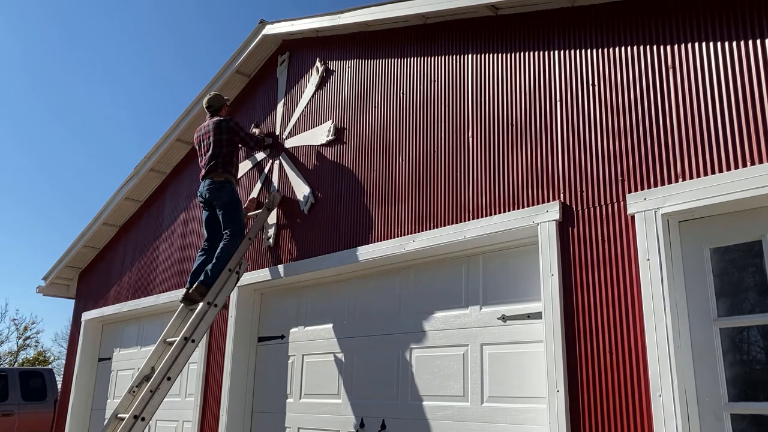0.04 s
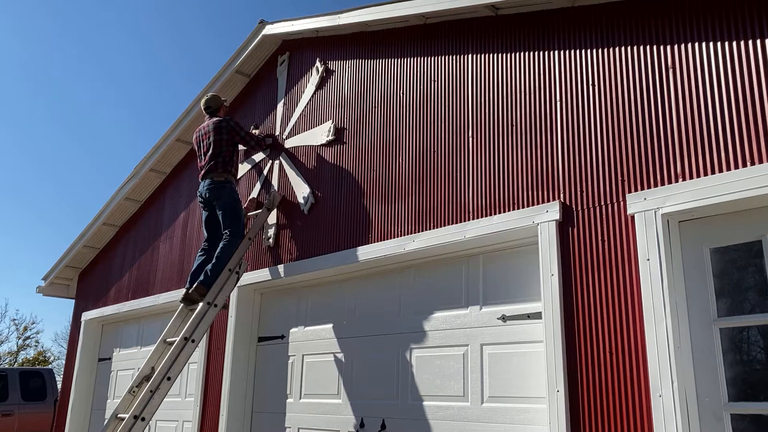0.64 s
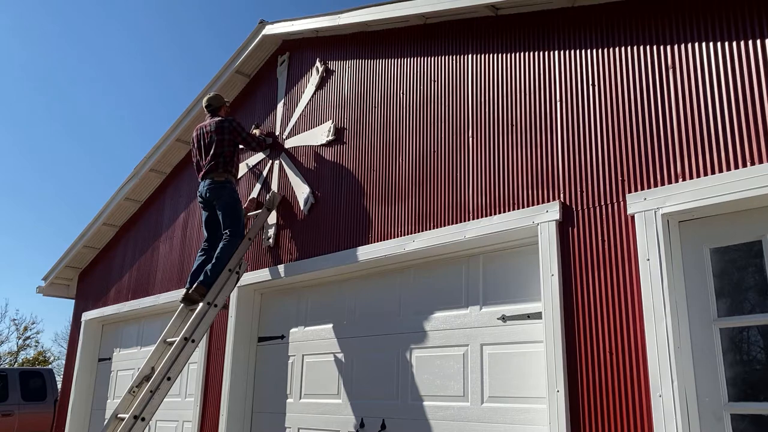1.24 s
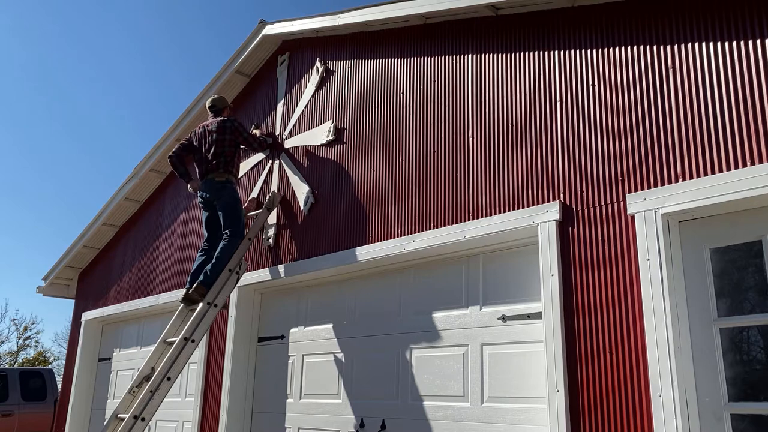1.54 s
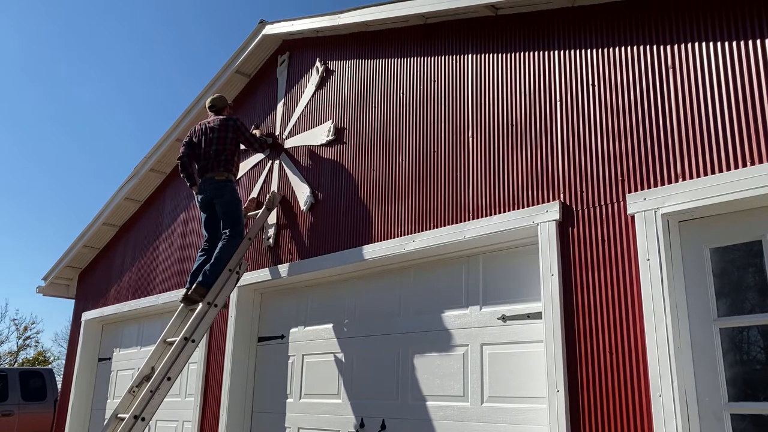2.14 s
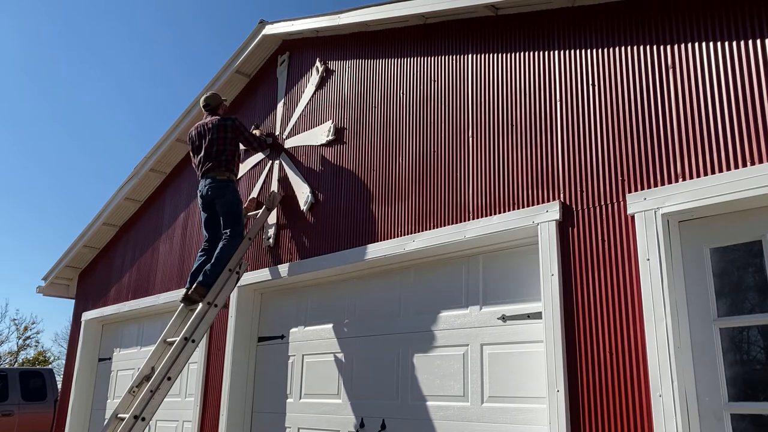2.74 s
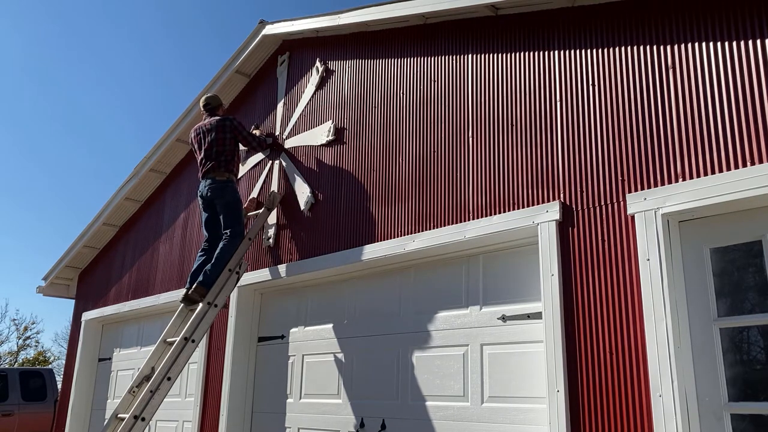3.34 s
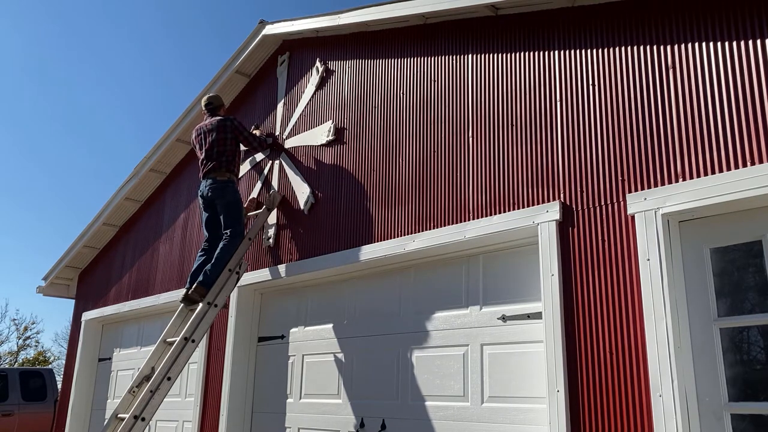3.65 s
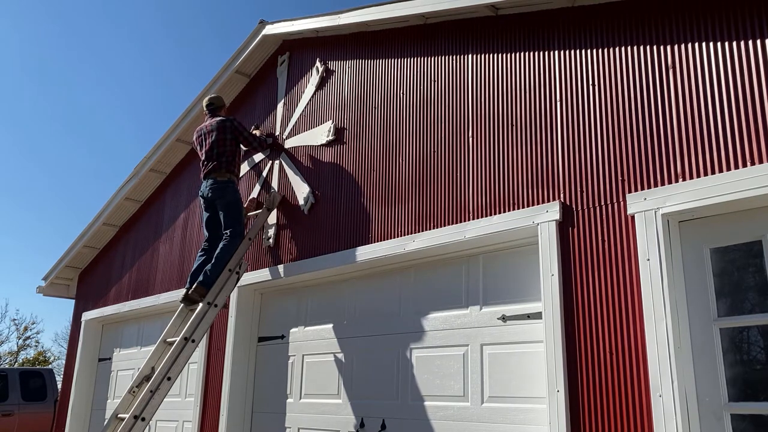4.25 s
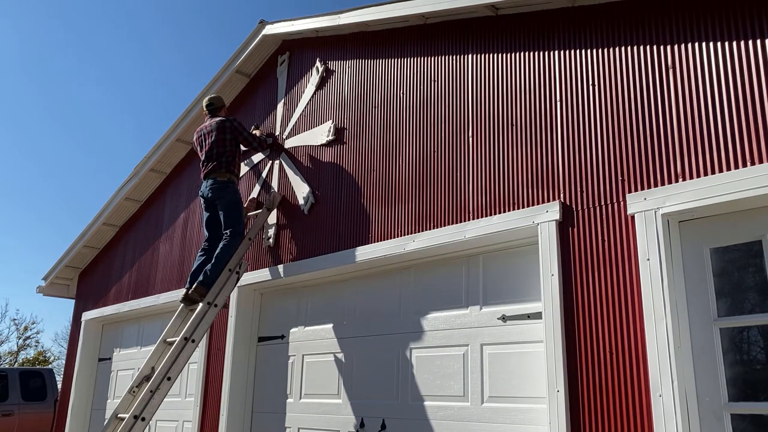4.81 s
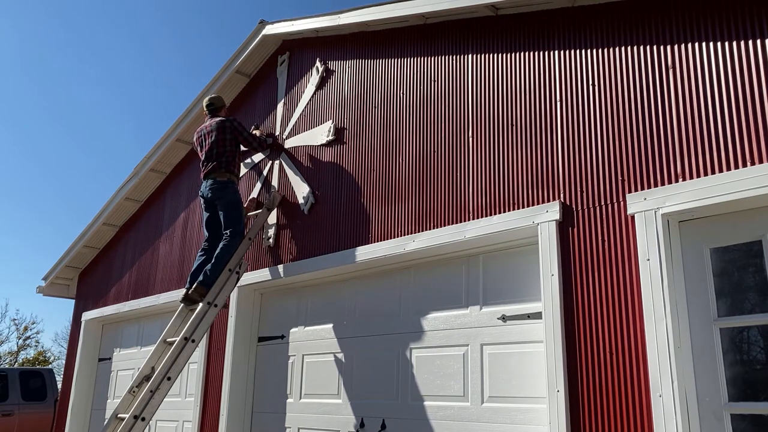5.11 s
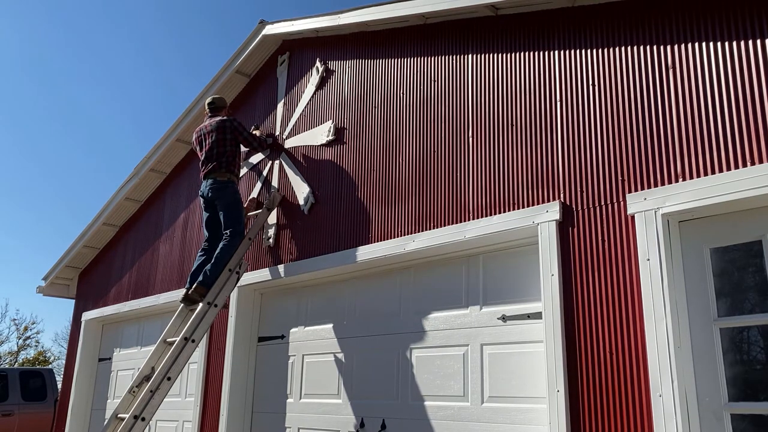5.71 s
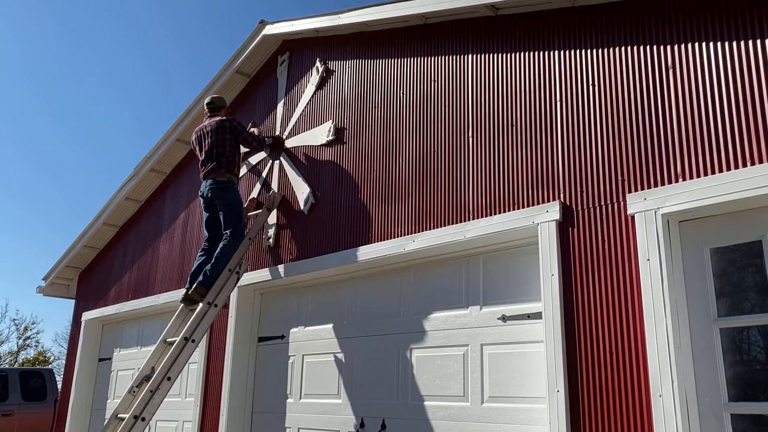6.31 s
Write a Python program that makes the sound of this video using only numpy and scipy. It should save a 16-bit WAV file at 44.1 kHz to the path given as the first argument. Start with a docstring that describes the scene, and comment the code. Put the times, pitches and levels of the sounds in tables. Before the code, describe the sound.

Someone works on a metal ladder against a sheet-metal barn wall. Light, uneven knocks come a few times a second, each with a small bounce and a short ringing clatter. They grow louder midway, ease off, then pick up near the end. Hanging steel saws click and faintly rattle among dull scuffs. Small birds chirp faintly in the yard, and a breeze flutters and thumps on the microphone.

```python
"""Knocks ring a metal ladder and a sheet-metal barn wall as someone works on old saws hung there.
Each knock bounces once, sets the metal ringing and clattering, and echoes briefly in the yard.
The steel saws click when tapped and rattle against the wall, among a few dull scuffs.
Small birds chirp overhead, and a light breeze flutters and thumps on the microphone
over a faint outdoor hush."""
import sys
import numpy as np
from scipy import signal
from scipy.fft import rfft, irfft, next_fast_len
from scipy.io import wavfile
from scipy.ndimage import uniform_filter1d

SR = 44100
rng = np.random.default_rng(int(sys.argv[2]) if len(sys.argv) > 2 else 0)


def dump_mix(stems):
    """Bounce the given channels to the path in sys.argv[1] as a 16-bit WAV at rate SR."""
    frames = np.atleast_2d(stems).T  # one column per channel
    limited = np.clip(frames, -1, 1)  # hard clip at full scale
    pcm = np.round(limited * 32767).astype(np.int16)
    wavfile.write(sys.argv[1], SR, pcm)


N = 289737

# Puffs of wind that hit the microphone:
# (time of the crest [s], level [dB], pitch [Hz], swell time [s], treble drop [dB per octave])
PUFFS = [(0.207, -33, 107, 0.0054, 20), (0.471, -47.5, 67.4, 0.028, 29), (0.599, -42.5, 78, 0.0073, 30),
         (0.951, -49.5, 61.4, 0.0098, 8), (1.229, -41, 87, 0.019, 17), (1.3, -35, 70.5, 0.0063, 21),
         (2.385, -54, 57.7, 0.019, 13.5), (2.778, -40, 70.7, 0.0055, 35), (3.018, -36.5, 69.3, 0.024, 26.5),
         (3.173, -34, 52.6, 0.015, 23), (3.222, -25, 80, 0.008, 18), (3.25, -25, 72.5, 0.01, 20),
         (3.463, -33, 93, 0.0048, 17.5), (3.589, -53.5, 253, 0.016, 16.5), (3.747, -60.5, 248, 0.018, 15),
         (4.257, -34, 60.3, 0.018, 15.5), (4.269, -32, 204.4, 0.0022, 23.5), (4.352, -45.5, 91, 0.027, 15),
         (4.547, -49.5, 68, 0.0077, 12), (5.373, -41, 172, 0.0049, 21), (5.436, -49, 94, 0.0082, 12.5),
         (5.759, -44, 80, 0.0066, 15.5), (5.939, -45, 71.5, 0.013, 14), (6.019, -43.5, 108, 0.015, 15),
         (6.174, -47.5, 60.7, 0.03, 21), (6.268, -53, 205, 0.013, 40), (6.417, -47, 59.4, 0.016, 41)]


def undb(db):
    """Turn decibels into a factor to multiply by."""
    return 10 ** (np.asarray(db) / 20)


def unit(x):
    """Scale a sound to an average (rms) strength of 1."""
    return x / np.sqrt(np.mean(x ** 2))


def colour(x, points):
    """Shape bass and treble along a curve of (frequency [Hz], gain [dB]) points."""
    hz, db = np.transpose(points)
    size = next_fast_len(x.shape[-1] + SR // 10)
    freqs = np.fft.rfftfreq(size, 1 / SR)
    gain = undb(np.interp(np.log(freqs + 1), np.log(hz), db))
    return irfft(rfft(x, size) * gain, size)[..., :x.shape[-1]]


def noise(size, side_db):
    """Stereo noise; the lower side_db is, the more alike left and right are."""
    mid, side = rng.standard_normal((2, size))
    return unit(mid + undb(side_db) * side * np.array([[1], [-1]]))


def walk(size, count):
    """Random levels joined by straight lines."""
    return np.interp(np.arange(size), np.linspace(0, size, count), rng.standard_normal(count))


def fade(t, t60):
    """Die away by 60 dB in t60 seconds, the fade time."""
    return np.exp(-np.log(1000) * t / t60)


def rise(t, rise_s):
    """Grow from 0 towards 1, about two thirds of the way in rise_s seconds."""
    return 1 - np.exp(-t / rise_s)


def pan(db):
    """Left and right gains; a negative db leans to the right."""
    return undb(np.array([[db], [-db]]) / 2)


def add(out, s, x):
    """Mix x into out at s seconds."""
    start = int(s * SR)
    first, last = max(start, 0), min(start + x.shape[-1], N)
    out[:, first:last] += x[..., first - start:last - start]


def yard(x, echo_s, echo_db, tail_db, t60, treble_db):
    """The yard adds one clear echo and a thin, fading tail to a sound."""
    t = np.arange(SR * 2 // 3) / SR
    tail = noise(len(t), side_db=-3.5) * fade(t, t60) * rise(t, 0.0033)
    response = tail * undb(tail_db) / np.sqrt(np.sum(tail ** 2) / 2)
    response[:, int(echo_s * SR)] += undb(echo_db)
    response = colour(response, [(1000, -1.5), (2800, 1.3), (10000, treble_db)])
    return x + signal.fftconvolve(x, response, axes=1)[:, :N]


def whistle(length, start_hz, end_hz, db, bend, octave_db):
    """One wobbly bird note with an overtone; more bend makes it slide early and then level off."""
    wobble_hz = 127
    progress = np.linspace(0, 1, int(length * SR))
    wobble = unit(uniform_filter1d(rng.standard_normal(len(progress)), size=40))
    slide = np.expm1(-bend * progress) / np.expm1(-bend)
    hz = start_hz + (end_hz - start_hz) * slide + wobble_hz * wobble
    phase = 2 * np.pi * np.cumsum(hz) / SR
    swell = np.abs(np.sin(np.pi * progress)) ** 1.35
    return undb(db) * swell * (np.sin(phase) + undb(octave_db) * np.sin(2 * phase))


def birds():
    """Small birds whistle rising and falling notes, which the trees and wall scatter."""
    # Rising chirps:
    # (time [s], length [s], start pitch [Hz], end pitch [Hz], level [dB], overtone against the note [dB])
    chirps = [(-.008, 0.028, 5900, 7615, -50, -13), (1.106, 0.031, 5700, 6770, -76.5, -30),
              (1.898, 0.039, 5800, 7670, -49.5, -8), (2.678, 0.056, 5540, 6580, -74, -38),
              (3.779, 0.03, 5560, 7750, -43.5, -18), (4.777, 0.019, 5200, 6400, -66.5, -30),
              (4.791, 0.033, 6400, 7590, -66.5, -30), (4.953, 0.037, 5700, 7780, -51.5, -35),
              (4.969, .055, 7340, 7720, -55.5, -30), (5.492, 0.041, 6360, 7800, -73.5, -30),
              (5.642, 0.046, 5900, 7700, -54, -16), (5.676, 0.035, 5900, 7600, -54.5, -22)]
    # Falling notes: (time [s], length [s], start pitch [Hz], end pitch [Hz], level [dB])
    falling_notes = [(0.756, 0.099, 7630, 7550, -80.5), (4.702, 0.016, 7550, 7000, -60),
                     (5.274, 0.062, 9100, 6940, -64), (6.016, 0.1, 8700, 6610, -63)]
    out = np.zeros((2, N))
    for s, length, start_hz, end_hz, db, octave_db in chirps:
        add(out, s, whistle(length, start_hz, end_hz, db, bend=2.5, octave_db=octave_db))
    for s, length, start_hz, end_hz, db in falling_notes:
        add(out, s, whistle(length, start_hz, end_hz, db, bend=0.56, octave_db=-33))
    out[1] = np.roll(out[1], 1)  # the birds sit off to one side
    return yard(out * pan(-1.9), echo_s=0.042, echo_db=-7, tail_db=1.0, t60=0.38, treble_db=-3.0)


def outdoor_hush():
    """A distant hush that dips slightly for a while and returns."""
    # Tone of the hush: (frequency [Hz], gain [dB])
    tone = [(88, -36.5), (150, -0.5), (495, -17), (954, -22), (1070, -27), (2750, -31.5), (3670, -33.5),
            (7500, -35), (8750, -41), (15000, -42.5)]
    # Loudness of the hush: (time [s], level [dB])
    levels = [(0, -72), (3.6, -71.5), (4.0, -73), (5.55, -72), (5.9, -70.5)]
    level_db = np.interp(np.arange(N) / SR, *np.transpose(levels))
    return unit(colour(noise(N, side_db=-2.5), tone)) * undb(level_db)


def breeze():
    """Wind on the microphone makes a low flutter that swells around every puff."""
    # Slow changes in the strength of the breeze: (time [s], relative level [dB])
    strength = [(0.0, -55.5), (0.66, -63.5), (1.41, -58.5), (1.61, -66), (2.21, -66), (3.02, -58),
                (3.16, -71), (3.33, -45.5), (3.57, -69), (3.82, -66.5), (4.21, -58.5), (4.85, -71),
                (5.32, -61.5), (5.73, -68.5), (6.15, -57.5), (6.57, -75)]
    lift_db, flicker_db, limit_db = 5, 2.5, -44
    rise_s, fall_s = 0.031, 0.029
    t = np.arange(N) / SR
    slow_db = np.interp(t, *np.transpose(strength)) + lift_db
    power = undb(slow_db + flicker_db * walk(N, count=80)) ** 2
    for s, db, *_ in PUFFS:
        swell = np.exp(-np.maximum((s - t) / rise_s, (t - s) / fall_s))
        power += (undb(db - 6) * swell) ** 2
    tone = [(12, -31.5), (22, -29), (28, -9), (45, -1), (62, 3), (78, -3), (110, -7.0), (150, -16),
            (300, -34.5), (700, -48), (2000, -77.5)]
    flutter = colour(noise(N, side_db=-5.0), tone)
    flutter /= np.sqrt(uniform_filter1d(np.mean(flutter ** 2, axis=0), SR // 12))  # even out its level
    return flutter * np.minimum(np.sqrt(power), undb(limit_db))


def scuffs():
    """Soft, grainy rubs that start quickly and die away."""
    # Dull rubs: (time [s], level [dB], fade time [s])
    rubs = [(0.025, -58, 0.45), (3.422, -48, 0.28), (3.569, -65, 0.19), (3.728, -62, 0.46),
            (4.756, -64.5, 0.39), (5.035, -64, 0.37), (5.636, -56.5, 0.5), (6.06, -64.5, 0.92),
            (6.135, -50, 0.3)]
    # Tone of a rub: (frequency [Hz], gain [dB])
    tone = [(80, 0), (260, 10.5), (420, 3.5), (700, -1.5), (1200, -13), (2000, -24.5), (4000, -43),
            (12000, -66)]
    out, t = np.zeros((2, N)), np.arange(SR // 3) / SR
    for s, db, t60 in rubs:
        grain = undb(3.6 * walk(len(t), count=80))
        rub = unit(colour(noise(len(t), side_db=-13.5) * grain, tone))
        add(out, s, rub * fade(t, t60) * rise(t, 0.0011) * undb(db + 1.0))
    return out


def saw_clicks():
    """Tapped saw steel gives a crack, a brief rattle and a ping that depends on the spot struck."""
    # Taps on the saws: (time [s], level [dB], hardness as treble boost [dB], favoured pitch [Hz])
    taps = [(0.11, -51, -10, 3830), (0.253, -60, -2.5, 2270), (0.621, -58, 7.5, 2070),
            (0.794, -64.5, 3, 2070), (1.323, -55.5, -7, 3900), (3.259, -50.5, -13.5, 3500),
            (3.875, -37, -2.5, 2840), (4.163, -60.5, -13, 1980), (5.245, -42, 0, 3900),
            (5.367, -59.5, -4, 3940)]
    # Tones a saw blade rings with: (pitch [Hz], level [dB], fade time [s])
    blade_tones = [(2000, -2.5, 0.097), (2160, 7, 0.066), (3110, 1, 0.063), (3480, -10, 0.17),
                   (3747, -7.5, 0.072), (3900, -2, 0.062), (5000, -1, 0.058)]
    # Tone of the crack: (frequency [Hz], gain [dB])
    crack_tone = [(500, -7.5), (1200, -5), (2100, 3), (3000, -2.5), (4000, 2.5), (5500, -6.5), (7000, -7),
                  (10000, -19.5), (15000, -5)]
    drop_db_per_octave = 28  # tones far from the favoured pitch ring less
    out, t = np.zeros((2, N)), np.arange(SR // 5) / SR
    hz, db, t60 = np.transpose(blade_tones)[:, :, None]
    for s, level_db, hard_db, ping_hz in taps:
        crack = noise(len(t), side_db=-7.5) * (fade(t, 0.025) + undb(-9.0) * fade(t, 0.19))
        shares = undb(db - drop_db_per_octave * np.abs(np.log2(hz / ping_hz)))
        ping = shares * fade(t, t60) * np.sin(2 * np.pi * (hz * t + rng.random(hz.shape)))
        swell = rise(t, 0.0021 * undb(-hard_db))  # a soft tap builds up more slowly
        hit = (colour(crack, crack_tone) + undb(-7) * ping.sum(0)) * swell
        add(out, s, colour(hit, [(4000, 0.0054), (9000, hard_db)]) * undb(level_db - 2.0))
    return out * pan(-0.67)


def contacts():
    """Each knock lands and bounces once, more dully: gives (time [s], level [dB], hardness [dB])."""
    # Knocks on ladder and wall:
    # (time [s], level [dB], hardness [dB], wait for the bounce [s], bounce against the knock [dB])
    blows = [(0.13, -50, -1, 0.069, -10.5), (0.383, -48.5, -0.5, 0.047, -17.5),
             (0.542, -54.5, -1, 0.039, -17), (0.888, -45, 0, 0.064, -22), (1.149, -49.5, -2, 0.044, -27),
             (1.361, -48, 0, 0.045, -16), (1.664, -51, -23, 0.06, -31), (1.969, -46, 0.5, 0.047, -10.5),
             (2.197, -51.5, -2.5, 0.047, 2.5), (2.479, -48, -2.5, 0.042, -7), (2.77, -38.5, 0, 0.087, -4.5),
             (3.063, -40, 1, 0.056, -7), (3.308, -46, -0.5, 0.063, -7), (3.626, -47.5, -0.5, 0.075, -22),
             (3.819, -54, 1.5, 0.072, -9.5), (4.384, -50, -1, 0.06, -19), (4.597, -59.5, -0.5, 0.076, -22),
             (4.867, -62.5, 1, 0.017, -21), (5.138, -66.5, 3, .025, -7), (5.422, -66.5, -5, 0.029, -12),
             (5.632, -44.5, 1, 0.071, -2.5), (5.885, -40.5, 1.5, 0.055, -3.5),
             (6.133, -43.5, -0.5, 0.049, -5.5), (6.359, -56.5, -0.5, 0.033, -21),
             (6.472, -60.5, 1, .03, -19)]
    for s, db, hard_db, gap_s, bounce_db in blows:
        yield s, db, hard_db
        yield s + gap_s, db + bounce_db, hard_db - 3


def wall_clatter(t, hiss):
    """Countless tones of the metal sheet blur together: the bass swells and lingers, the treble dies first."""
    # Tone of the clattering wall: (frequency [Hz], gain [dB])
    tone = [(200, 2), (450, -0.5), (860, 9.5), (1080, -7.5), (1650, -3), (2450, -1), (2780, 4.5),
            (3200, -4), (4300, -7.5), (7000, -8.5), (8600, -21), (11400, -14), (12500, -28), (15500, -28)]
    grain_db = 2.5  # loose sheet edges chatter as a knock fades
    chatter = hiss * undb(grain_db * (1 - fade(t, 0.063)) * walk(len(t), count=70))
    low = colour(chatter, [(2000, -7.5), (10000, -17.0)])
    high = chatter - low
    return colour(low * fade(t, 0.25) * rise(t, 0.018) + high * fade(t, 0.087), tone)


def knocks():
    """Each knock rings ladder and wall with the same tones in a new mix; harder and louder is brighter."""
    # Tones the ladder and wall ring with: (pitch [Hz], level [dB], fade time [s])
    metal_tones = [(412, -16, .3), (453, -18, .4), (558, -21, .75), (734, -13.5, .33), (790, -10.5, .26),
                   (819, -6.5, .21), (953, -5, .16), (975, 1, .18), (1185, -16, .2), (1305, -13, .13),
                   (1604, -13.5, .17), (1700, -14, .17), (1752, -15, .19), (1930, -15, .16),
                   (2305, -9, .11), (2560, -14, .15), (2682, -4, .2), (2735, -6, .15), (2878, -8, .19),
                   (2940, -9.5, .14), (3060, -13, .15), (3417, -17, .17), (3517, -15, .18),
                   (4290, -15, .12), (5750, -17, .14)]
    alike = 0.64  # share of the clatter's noise that every knock has in common
    waver_step = SR // 100  # samples
    out, t = np.zeros((2, N)), np.arange(SR * 2 // 5) / SR
    hz, db, t60 = np.transpose(metal_tones)[:, :, None]
    tones = undb(db) * fade(t, t60) * rise(t, 0.009) * np.exp(2j * np.pi * hz * t)
    # high tones reach left and right out of step
    spread = np.minimum(hz / 6000, 1) * (-1) ** np.arange(len(hz))[:, None]
    to_stereo = np.exp(1j * spread * [1, -1]).T
    shared_hiss = noise(len(t), side_db=-6.5)
    for s, level_db, hard_db in contacts():
        # waves return from the edges of the sheet, so each tone wavers as it fades
        jitter = rng.standard_normal((len(hz), len(t) // waver_step, 2)) @ [1, 1j]
        start_phase = np.exp(2j * np.pi * rng.random((len(hz), 1)))
        steps = np.repeat(start_phase + 0.25 * jitter, waver_step, axis=1)
        waver = uniform_filter1d(steps, size=waver_step, axis=1)
        ring = (to_stereo @ (tones * waver)).imag
        hiss = np.sqrt(alike) * shared_hiss + np.sqrt(1 - alike) * noise(len(t), side_db=-5.5)
        clatter = undb(8.5) * wall_clatter(t, hiss)
        swell = rise(t, 0.0048 * undb(-0.3 * hard_db))  # a softer blow spreads more slowly in the sheet
        treble_db = 0.59 * hard_db + 0.17 * (level_db + 45.5)
        top_db = 5.1 * hard_db + 0.5 * (level_db + 41.0)
        brightness = [(1700, 0.0063), (2900, 0.67 * hard_db), (4500, treble_db), (12000, top_db)]
        hit = colour((ring + clatter) * swell, brightness)
        start_strength = np.sqrt(np.mean(hit[:, t < 0.025] ** 2))
        add(out, s, hit / start_strength * undb(level_db - 8.5))
    # the low ring comes from the left; the wall throws the high ring to the right
    left = colour(out[0], [(1300, 0.7), (3000, -3.5), (12000, 1.0)])
    right = colour(out[1], [(1300, -1.5), (3000, -1.0), (12000, 2.0)])
    return np.array([left, right])


def saw_rattles():
    """Loose blades chatter against the wall in uneven bursts that swell and fade."""
    # Blades scraping and rattling: (time [s], length [s], level [dB])
    bursts = [(0.14, 0.19, -77), (0.557, 0.12, -74.5), (1.67, 0.53, -81), (4.11, 0.074, -72),
              (6.015, 0.2, -74), (3.419, 0.037, -70.5)]
    # Tone of a rattle: (frequency [Hz], gain [dB])
    tone = [(500, 8), (1200, 0.5), (2100, 2.5), (3300, -1), (4800, -15.5), (10000, -25)]
    out = np.zeros((2, N))
    for s, length, db in bursts:
        size = int(length * SR)
        grain = undb(-1.5 * walk(size, count=50))
        chatter = unit(colour(noise(size, side_db=-6) * grain, tone))
        add(out, s, chatter * signal.windows.tukey(size, 0.5) * undb(db))
    return out


def wind_thumps():
    """Single swirls of air hit the microphone as soft thumps, part noise and part low tone."""
    out, t = np.zeros((2, N)), np.arange(-SR // 8, SR // 8) / SR
    side_phase = np.array([[0.2], [-0.2]])  # the air passes one side before the other
    for s, db, hz, swell_s, drop_db in PUFFS:
        swell = np.exp(1 - np.hypot(t / swell_s, 1))
        swirl = colour(noise(len(t), side_db=-14), [(hz / 4, -25), (hz, 0), (hz * 2 ** 7, -7 * drop_db)])
        low_tone = np.sin(2 * np.pi * (hz * t + rng.random()) + side_phase)
        thump = unit(unit(swirl * swell) * undb(4.0) + unit(low_tone * swell))
        add(out, s + t[0], thump * np.sqrt(np.mean(swell ** 2)) * undb(db - 1.5))
    return out


def scene():
    """Mix the work on the wall and its echo with the birds, the wind and the hush."""
    knocking = yard(knocks(), echo_s=0.057, echo_db=-25, tail_db=-20, t60=0.41, treble_db=-9)
    wind = (breeze() + wind_thumps()) * pan(-2.0)
    return knocking + saw_clicks() + saw_rattles() + scuffs() + birds() + wind + outdoor_hush()


def record(dry):
    """The recorder cuts off the highest treble."""
    top_hz = 15700
    return signal.sosfilt(signal.ellip(8, 0.2, 70, top_hz, fs=SR, output="sos"), dry)


dry = scene()
out = record(dry)
dump_mix(out)
```